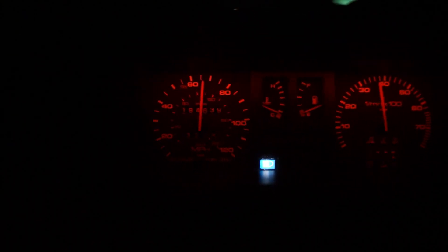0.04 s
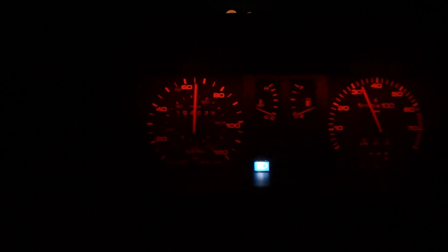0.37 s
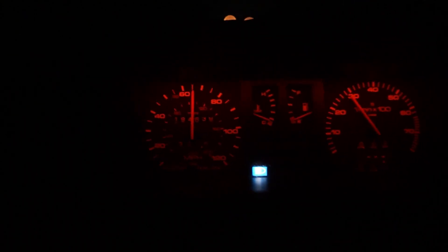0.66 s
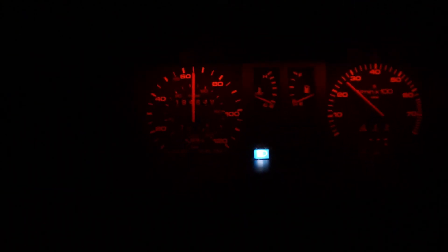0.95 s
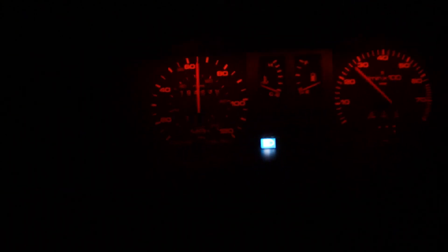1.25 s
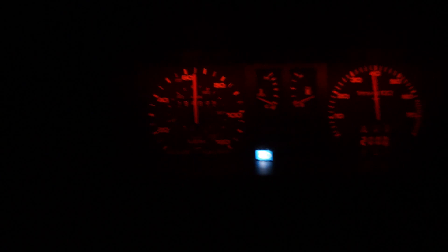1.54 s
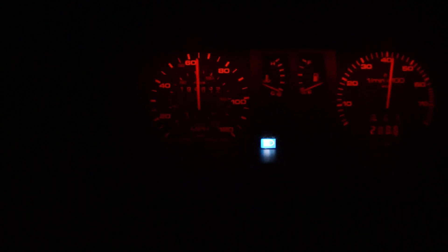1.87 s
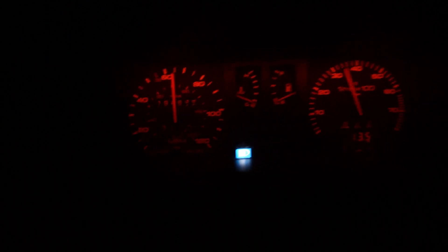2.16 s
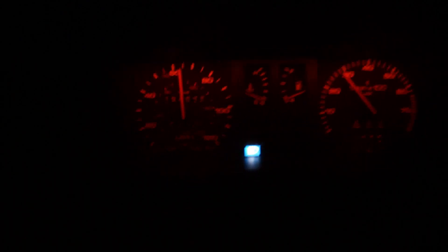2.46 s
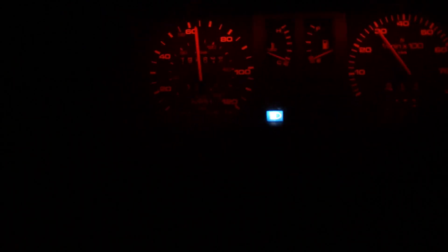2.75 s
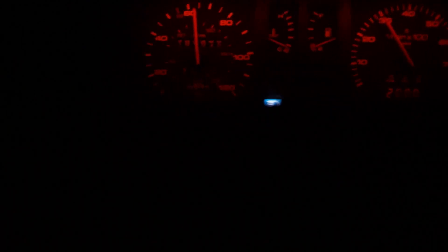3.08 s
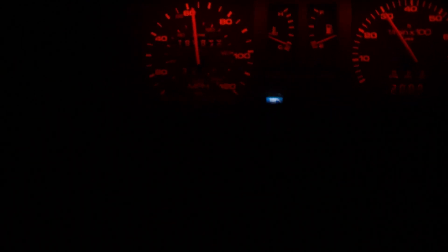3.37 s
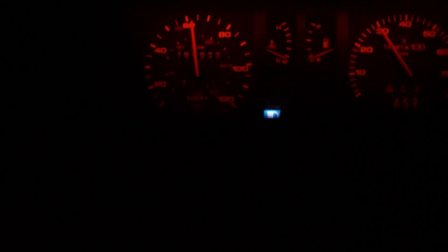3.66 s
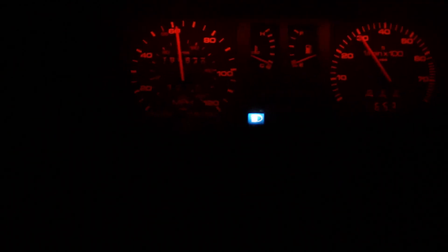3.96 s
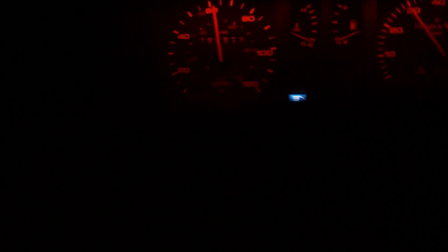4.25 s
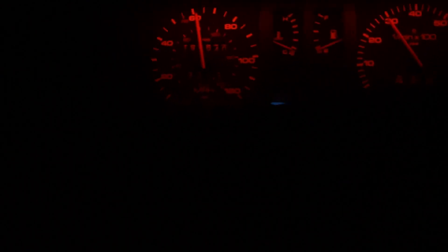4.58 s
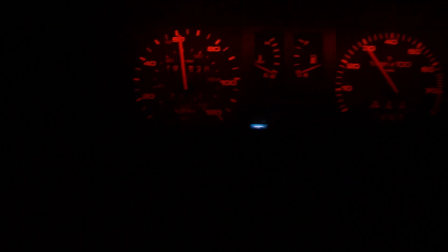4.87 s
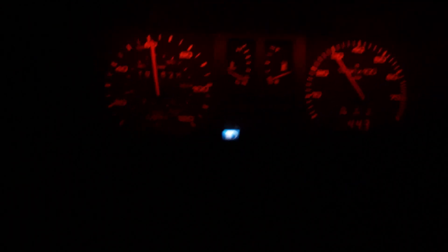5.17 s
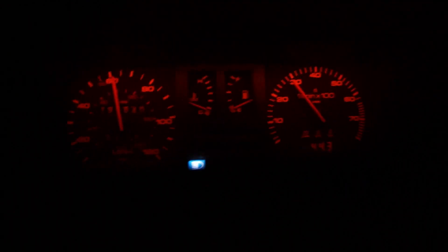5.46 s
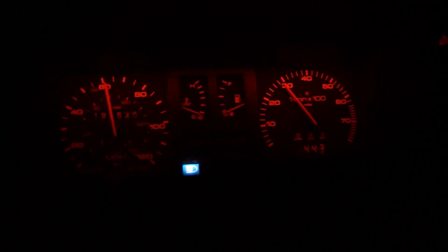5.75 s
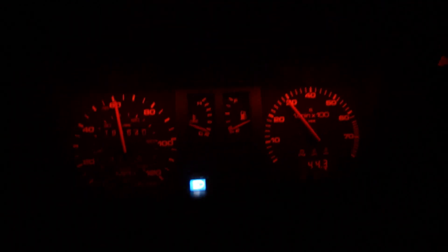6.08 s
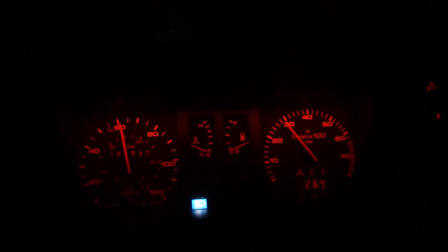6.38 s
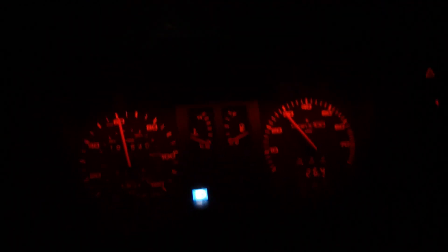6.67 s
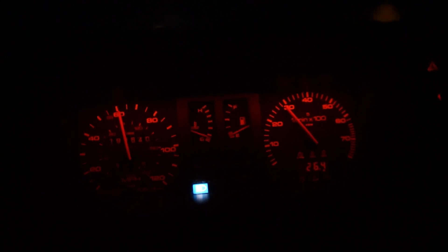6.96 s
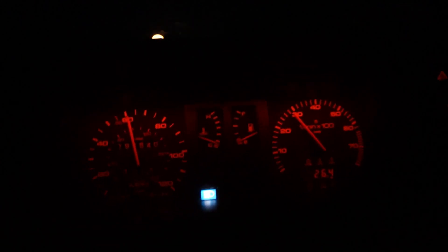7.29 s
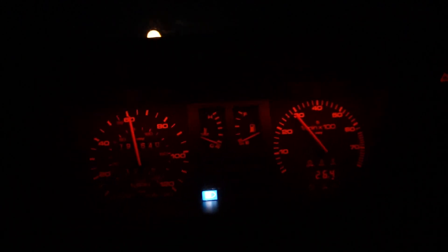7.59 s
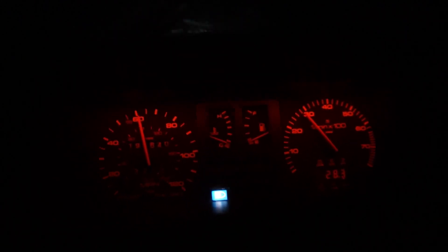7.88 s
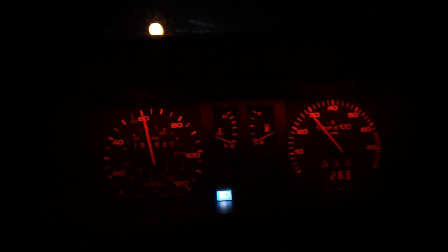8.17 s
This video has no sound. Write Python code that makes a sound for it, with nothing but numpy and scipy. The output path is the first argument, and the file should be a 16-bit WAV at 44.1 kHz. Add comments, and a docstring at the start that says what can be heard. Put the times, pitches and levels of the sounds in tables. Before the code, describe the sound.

A loud car exhaust booms inside the cabin at highway speed, over constant tyre roar and a light wind hiss, all somewhat stronger on the left. The revs sink through the first second, with a few very faint high scratches. From about 1.1 to 1.6 seconds the engine is blipped for a downshift, rising sharply with a rasp. The road thumps near 1.8 seconds, and the exhaust burbles as its pitch falls until about 2.2 seconds. It stumbles and softens around 3 seconds, letting the road noise come forward. From about 3.6 seconds the engine pulls again in a steady, throbbing drone. The trim ticks a few times between 5.4 and 6 seconds, and small bumps come near 6.2 and 8.1 seconds, the last with a faint metallic ping. A thin whine comes and goes faintly. The throttle eases at about 8.2 seconds.

```python
"""Inside a five-cylinder car with a loud exhaust, on a highway at night.
The revs sink, are blipped for a downshift and burble on the overrun; then the engine pulls steadily,
throbbing as one cylinder blows harder. Tyres and wind wash around the cabin; the road thumps and the
trim ticks now and then, with a faint whine, high scratches and one ping.
Automatic gain control lifts the road noise whenever the exhaust eases."""
import sys
import numpy as np
from scipy import signal
from scipy.fft import rfft, irfft
from scipy.io import wavfile
from scipy.ndimage import uniform_filter1d

SR = 44100
rng = np.random.default_rng(int(sys.argv[2]) if len(sys.argv) > 2 else 0)


def to_wav(s):
    """Save 16-bit WAV."""
    ch = np.atleast_2d(s).T  # columns
    pcm = np.round(np.clip(ch, -1, 1) * 32767)  # PCM
    wavfile.write(sys.argv[1], SR, pcm.astype(np.int16))


N = 371763
T = np.arange(N) / SR
HZ = np.fft.rfftfreq(N, 1 / SR)

# per cylinder, in firing order: (extra blow strength [ratio])
CYLINDER_EXTRA = [1.0, 0.0, 0.0, 0.0, 0.0]
# engine speed: (time [s], firing rate [Hz])
FIRING_RATE = [(0.0, 155.07), (0.55, 123.41), (1.07, 96.29), (1.55, 183.62), (1.64, 173.13), (2.03, 152.47),
               (2.22, 125.39), (2.7, 125.33), (3.2, 122.85), (4.1, 121.41), (6.0, 120.76), (8.15, 119.98),
               (8.43, 118.45)]


def amp(db):
    """Decibels to gain."""
    return 10 ** (np.asarray(db) / 20)


def unit_rms(x):
    """Scale to rms 1."""
    return x / np.sqrt(np.mean(x ** 2) + 1e-20)


def curve(rows):
    """A (time, value) table at every sample."""
    return np.interp(T, *np.transpose(rows))


def per_bin(rows, column=1):
    """A column of a frequency table at every bin."""
    table = np.transpose(rows)
    return np.interp(np.log(HZ + 1), np.log(table[0] + 1), table[column])


def wander(rate_hz):
    """Random curve, rms 1."""
    knots = rng.standard_normal(2000)
    return unit_rms(np.interp(T * rate_hz, np.arange(len(knots)), knots))


def pipe_response(low_cut_hz=116):
    """Complex response of exhaust pipe and cabin; falls steeply under the lowest resonance."""
    # (centre [Hz], width [Hz], level [dB])
    resonances = [(138.05, 26.8, 3.5), (200.5, 33.3, -1.5), (262, 88, -26), (323, 24, -19),
                  (378.5, 30.7, -14), (510.5, 42, -27), (637.4, 25, -31.5), (737, 41, -43.5),
                  (882, 65, -39), (1040, 180, -44.5)]
    power = sum((amp(db) / (1 + (2 * (HZ - hz) / width) ** 2)) ** 2 for hz, width, db in resonances)
    power = power / (1 + (low_cut_hz / (HZ + 1)) ** 8) + 1e-9
    cepstrum = irfft(np.log(power) / 2, N)
    minimum_phase = np.exp(rfft(2 * cepstrum * (np.arange(N) < N // 2)) - cepstrum[0])
    # the flexing body shell passes sound on late, most around the boom
    shell_lag_rad = 1 + 1.2 / (1 + ((HZ - 138) / 22) ** 2)
    return minimum_phase * np.exp(-1j * shell_lag_rad)


def drone(firings, pipe, boom_db, overtone_db, rasp_db, waver_db=0.47, lag_rad=0.069, shake_turns=0.014):
    """Even part of the firing: a booming fundamental, and overtones that roughen under hard throttle."""
    # cabin boom at middle revs: (firing rate [Hz], level [dB])
    cabin_boom = [(95, -25), (100, -16), (110, -14), (120, -10), (140, -7.5), (160, -9.5), (172, -11.5),
                  (184, -19.5)]
    rate_hz = curve(FIRING_RATE)
    pipe_rad = np.unwrap(np.angle(pipe))

    def partial(order, turns):
        shift_rad = np.interp(order * np.median(rate_hz), HZ, pipe_rad)
        return np.sqrt(2) * np.cos(2 * np.pi * order * turns + shift_rad)

    shaken = firings + shake_turns * amp(rasp_db - rasp_db.max()) * wander(130)
    levels = [amp(db + waver_db * wander(10)) for db in (0.5, -6.5, -19.5, -24.5, -27.5)]
    overtones = sum(level * partial(order, shaken) for order, level in enumerate(levels, 2))
    boom = partial(1, firings - lag_rad / (2 * np.pi))
    cabin_db = np.interp(rate_hz, *np.transpose(cabin_boom))
    return amp(boom_db + cabin_db) * boom + amp(overtone_db) * overtones


def uneven_blows(firings, pipe, throb_db, burble_db):
    """Unequal firings ring the pipe: the cylinder pattern throbs, random scatter burbles."""
    count = np.floor(firings).astype(int)
    pulses = np.diff(count, prepend=count[0])
    pattern = (np.array(CYLINDER_EXTRA) - np.mean(CYLINDER_EXTRA))[count % len(CYLINDER_EXTRA)]
    scatter = rng.standard_normal(2000)[count]
    throb = unit_rms(irfft(rfft(pulses * pattern) * pipe, N))
    burble = unit_rms(irfft(rfft(pulses * scatter) * pipe, N))
    return amp(throb_db) * throb + amp(burble_db) * burble


def rasp(firings, rasp_db, edge_ratio, puff_turns=0.47, hard_extra=1.1):
    """Each blow is a sharp edge and a dying puff of turbulent gas."""
    # (frequency [Hz], gain [dB])
    colour = [(130, -24.5), (240, 5), (330, 2), (430, -1), (520, 1.5), (750, -12), (1100, -18.5),
              (1450, -10), (1700, -29), (1950, -18.5), (2700, -35.5), (5000, -52.5)]
    count = np.floor(firings).astype(int)
    strength = 1 + hard_extra * np.array(CYLINDER_EXTRA)[count % len(CYLINDER_EXTRA)]
    puffs = unit_rms(np.exp(-(firings % 1) / puff_turns) * rng.standard_normal(N))
    edges = unit_rms(np.diff(count, prepend=count[0]))
    blows = strength * (puffs + edge_ratio * edges) / np.hypot(1, edge_ratio)
    return amp(rasp_db) * unit_rms(irfft(rfft(blows) * amp(per_bin(colour)), N))


def exhaust(left_db=2.5, right_db=-3.0, start_turns=1.29):
    """Exhaust note: engine speed sets the pitch, load the voice."""
    # below 0 the wheels drive the engine, 1 is wide open: (time [s], load [ratio])
    engine_load = [(0, -0.17), (.6, -0.13), (1.05, -0.043), (1.16, 0.73), (1.25, 0.78), (1.47, 1),
                   (1.58, -0.044), (1.66, -0.23), (2.05, -0.25), (2.7, -0.19), (3.05, -0.1), (3.52, -0.025),
                   (3.65, 0.19), (4.05, 0.17), (4.35, 0.33), (8.12, 0.26), (8.23, 0.071), (8.32, -0.16)]
    # braking, coasting, slack, cruising, wide open:
    # (load [ratio], boom [dB], overtones [dB], throb [dB], burble [dB], rasp [dB], edge/puff [ratio])
    voices = [(-.3, 1, -31.5, -17, -20.5, -39, 1), (-.17, 2.5, -32.5, -19, -26, -43, 0.92),
              (0, -8, -36, -24.5, -26.5, -50.5, 1.1), (.3, 0, -24, -13, -31, -40.5, 3),
              (1, 1.5, -19, -19.5, -16.5, -22, .9)]
    firings = start_turns + np.cumsum(curve(FIRING_RATE)) / SR  # one turn per firing
    load = curve(engine_load)
    loads, *columns = np.transpose(voices)
    voice = [np.interp(load, loads, column) for column in columns]
    boom_db, overtone_db, throb_db, burble_db, rasp_db, edge_ratio = voice
    pipe = pipe_response()
    dip_db, rise_db = stumbles()
    note = drone(firings, pipe, boom_db - dip_db, overtone_db, rasp_db)
    note += uneven_blows(firings, pipe, throb_db + rise_db, burble_db)
    note += rasp(firings, rasp_db, edge_ratio)
    # standing waves in the cabin turn the phase on the right
    right = (signal.hilbert(note) * np.exp(-.38j)).real
    return np.array([amp(left_db) * note, amp(right_db) * right])


def cabin_noise(colour):
    """Diffuse noise at two microphone ports: partly coherent, louder on the left."""
    # (frequency [Hz], left over right [dB], coherence [0-1], left lead [rad])
    ports = [(30.2, 2.5, 0.87, .55), (103, 3, 1, .4), (200, 12, 1, 1), (400, 13.5, 0.7, 3.1),
             (730, 2, 0.4, 1.17), (1320, 5.5, .35, 1.1), (2000, 5.5, 0.6, 2.05), (2900, 7, 0.4, 2),
             (4170, 3, .5, 3), (5240, 2, 0.4, 4.56), (7000, 2.5, 0.5, 7), (10000, 1, 0.7, 7.1),
             (15000, 0.5, 0.3, 7.3)]
    common, separate = rfft(rng.standard_normal((2, N))) * amp(per_bin(colour))
    tilt = amp(per_bin(ports, column=1) / 2)
    coherence = np.clip(per_bin(ports, column=2), 0, 1)
    right = coherence * common + np.sqrt(1 - coherence ** 2) * separate
    right *= np.exp(-1j * per_bin(ports, column=3))
    pair = irfft(np.array([common * tilt, right / tilt]), N)
    return pair / np.std(pair.mean(0))


def tyres(level_db=-25.5, rough_db=0.67):
    """Tyres roar on uneven asphalt."""
    # (frequency [Hz], relative density [dB])
    roar = [(12, -10), (30, 4), (48, -2), (80, -0.5), (200, -6), (300, -8), (480, -11.5), (750, -19.5),
            (1150, -23), (1400, -20), (1650, -24), (1950, -22), (2200, -26), (3350, -31.5), (3600, -49)]
    return amp(level_db + rough_db * wander(22)) * cabin_noise(roar)


def wind(level_db=-50.5, gust_db=0.8):
    """Wind hisses at the window seals."""
    # (frequency [Hz], relative density [dB])
    hiss = [(2500, -15), (3600, 4), (4500, 3.5), (5600, 0), (7000, -4), (9000, -9.5), (12000, -28.5),
            (14500, -38), (15700, -20)]
    return amp(level_db + gust_db * wander(30)) * cabin_noise(hiss)


def thin_tone(hz, spread_hz):
    """Sine of wavering pitch, rms 1."""
    return np.sqrt(2) * np.sin(2 * np.pi * np.cumsum(hz + spread_hz * wander(90)) / SR)


def whine(fade_s=.1):
    """A faint whine comes and goes, mostly on the left."""
    # (start [s], length [s], level before panning [dB])
    spells = [(0, 2, -59.5), (3.549, .2, -57), (6.3, 2.2, -60)]
    level = sum(amp(db) * np.clip(np.minimum(T - start_s, start_s + length_s - T) / fade_s, 0, 1)
                for start_s, length_s, db in spells)
    return level * thin_tone(hz=3232, spread_hz=22) * np.array([[1.5], [.5]])


def bursts(rows, colour, rise_s):
    """Short dying bursts of cabin noise."""
    level = np.zeros(N)
    for start_s, db, decay_s in rows:
        age_s = np.maximum(T - start_s, 0)
        level += amp(db) * (1 - np.exp(-age_s / rise_s)) * np.exp(-np.minimum(age_s / decay_s, 30))
    return level * cabin_noise(colour)


def scratches(decay_s=.03):
    """Faint high scratches in two runs."""
    # (time [s], level [dB])
    strokes = [(.17, -53), (.272, -49.5), (.372, -48), (.482, -51), (.589, -47), (.702, -50), (3.29, -54),
               (3.63, -56), (3.73, -53)]
    # (frequency [Hz], gain [dB])
    colour = [(8000, -38.5), (11000, -4.5), (15000, -8)]
    return bursts([(start_s, db, decay_s) for start_s, db in strokes], colour, rise_s=.004)


def stumbles():
    """Overrun stumbles: boom dip and throb rise over time, both in dB."""
    # (centre [s], half length [s], boom dip [dB], throb rise [dB])
    events = [(1.84, 0.13, 1.5, 4.5), (2.796, 0.058, 8.5, 2), (2.98, 0.047, 4.5, 1), (3.386, 0.047, 0, 10),
              (8.245, .03, 0.5, 3)]
    centre_s, half_s, dip_db, rise_db = np.transpose(events)
    swell = np.exp(-((T[:, None] - centre_s) / half_s) ** 2)
    return swell @ dip_db, swell @ rise_db


def road_bumps():
    """Bumps in the road thump through the cabin."""
    # (time [s], level [dB], decay [s])
    thumps = [(1.755, -14, 0.024), (2.715, -29, 0.016), (6.155, -24, 0.017), (8.072, -20.5, 0.016)]
    # (frequency [Hz], gain [dB])
    colour = [(80, -10.5), (300, 9), (520, 0), (800, -11), (1100, -17), (1450, -5), (2000, -20),
              (3000, -22.5), (4500, -33), (9000, -46)]
    return bursts(thumps, colour, rise_s=.0022)


def trim_ticks():
    """The trim gives short, bright ticks."""
    # (time [s], level [dB], decay [s])
    ticks = [(2.4, -43, 0.014), (2.718, -46.5, .006), (5.422, -30, .0015), (5.627, -37, .002),
             (5.998, -42, .004)]
    # (frequency [Hz], gain [dB])
    colour = [(1500, -23), (4500, 2), (9000, -8), (15000, -9.5)]
    return bursts(ticks, colour, rise_s=.0004)


def ping(start_s=8.07, level_db=-52, decay_s=.12):
    """One small metallic ping."""
    envelope = (T > start_s) * np.exp(-abs(T - start_s) / decay_s)
    return amp(level_db) * envelope * thin_tone(hz=6940, spread_hz=45)


def scene():
    """Exhaust, tyres, wind and small cabin noises, in stereo."""
    small_noises = scratches() + road_bumps() + trim_ticks()
    return exhaust() + tyres() + wind() + whine() + ping() + small_noises


def record(dry, threshold_db=-7.0, recover_db_per_s=3.2, cutoff_hz=15700):
    """Gain control ducks fast under the boom and recovers slowly, so lulls swell; then a low-pass."""
    left_power = uniform_filter1d(uniform_filter1d(dry[0] ** 2, size=360), size=300)
    over_db = np.maximum(10 * np.log10(abs(left_power) + 1e-12) - threshold_db, 0)
    recovery_db = recover_db_per_s * T
    duck_db = np.maximum.accumulate(over_db + recovery_db) - recovery_db
    ducked = dry / amp(uniform_filter1d(duck_db, size=400))
    low_pass = signal.firwin(511, cutoff_hz, window=("kaiser", 9), fs=SR)
    return signal.oaconvolve(ducked, low_pass[None], "same")


dry = scene()
out = record(dry)
to_wav(out)
```